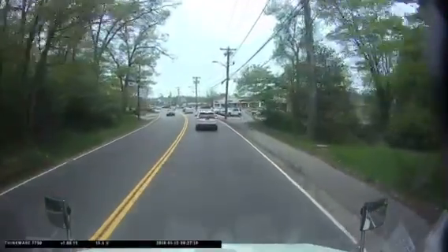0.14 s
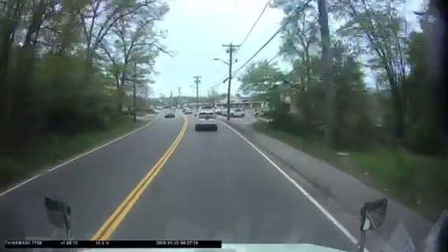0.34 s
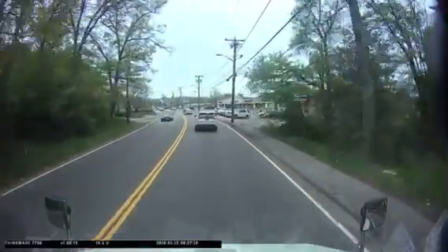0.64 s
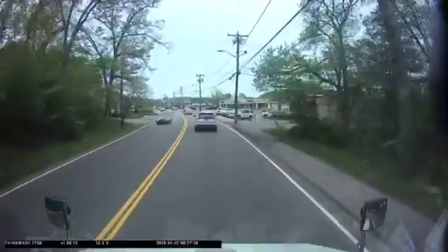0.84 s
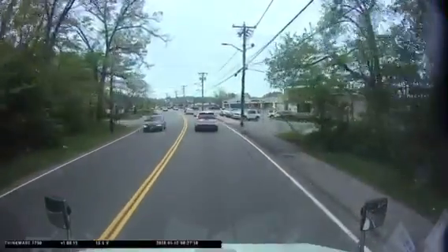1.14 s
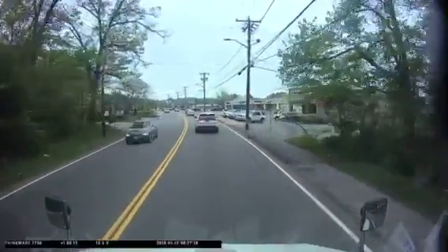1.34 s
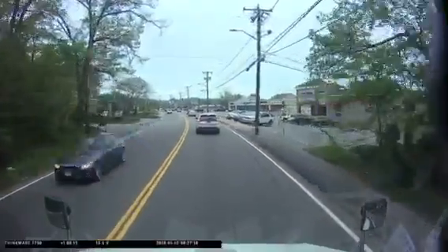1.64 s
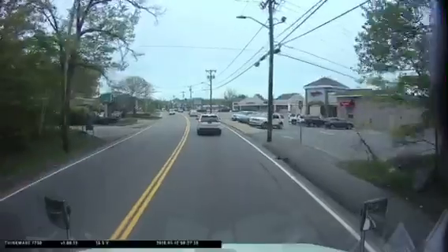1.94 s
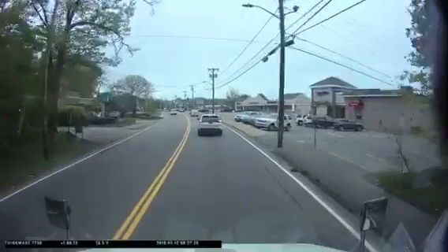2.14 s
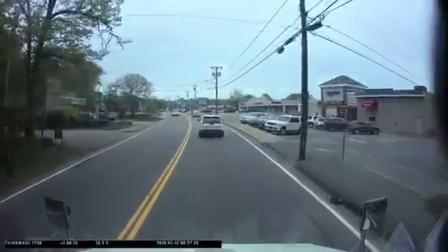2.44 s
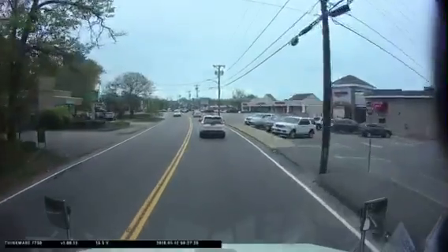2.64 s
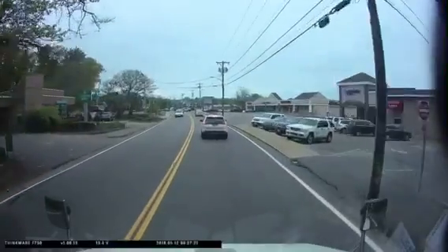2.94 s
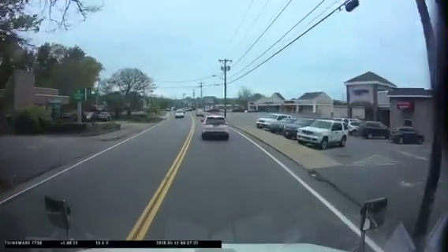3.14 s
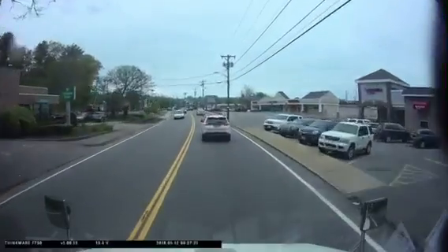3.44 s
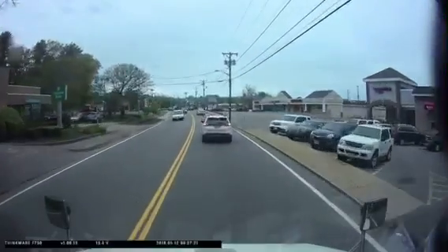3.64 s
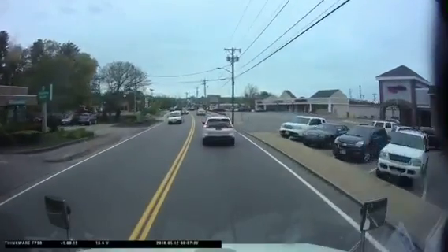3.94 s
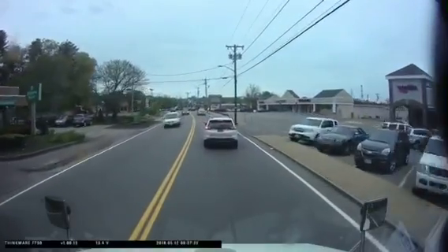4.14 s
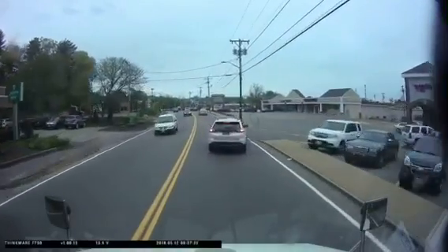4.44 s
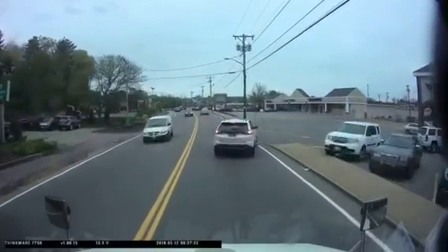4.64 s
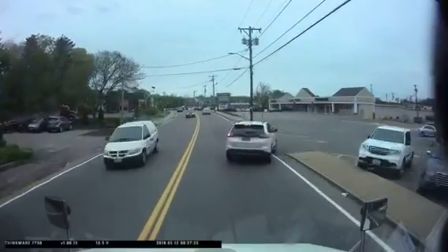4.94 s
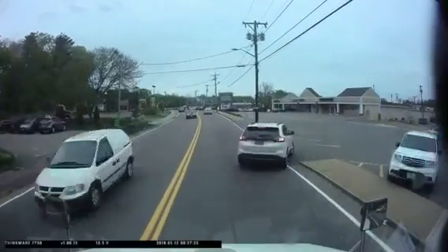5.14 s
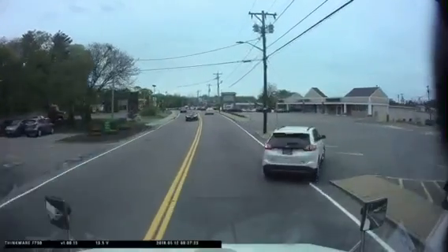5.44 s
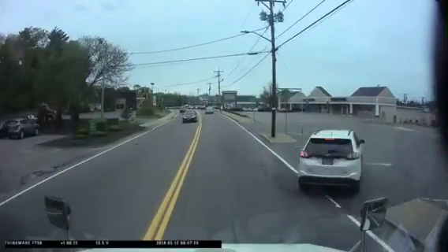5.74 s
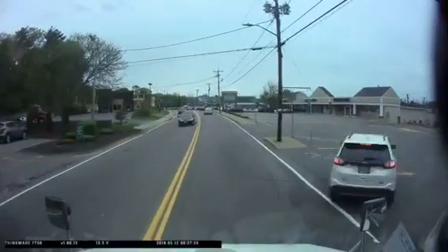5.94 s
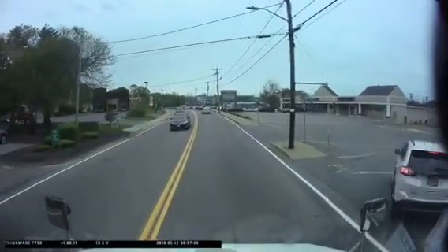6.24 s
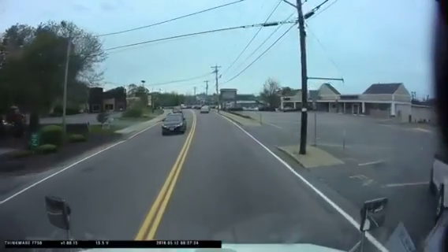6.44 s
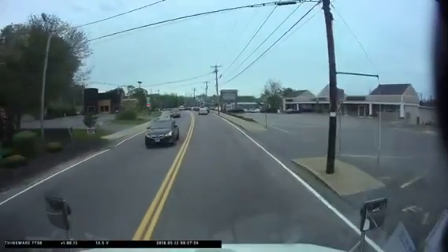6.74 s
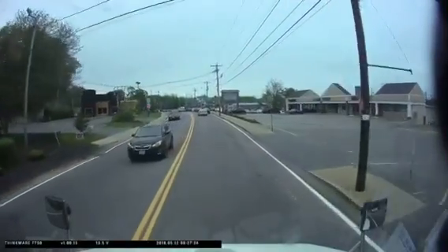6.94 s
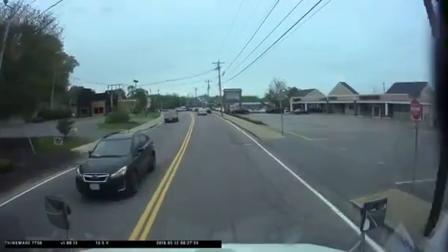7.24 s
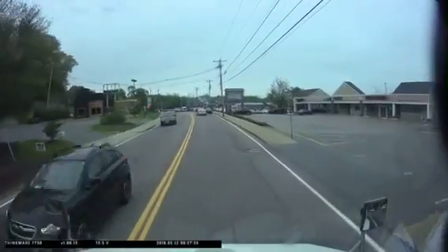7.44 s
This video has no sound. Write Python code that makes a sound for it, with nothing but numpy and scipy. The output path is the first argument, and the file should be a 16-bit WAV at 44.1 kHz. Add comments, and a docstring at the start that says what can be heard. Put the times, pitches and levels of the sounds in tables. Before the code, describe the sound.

Heard from a microphone inside a diesel truck cab: deep swaying rumble and dull tyre roar throughout, with a loose panel buzzing and ringing at bumps. The engine hum sinks as the truck coasts. A car swishes by, then trim clacks and squeaks and a little metal piece clinks. The engine pulls again with rough clatter, another car passes more softly, and the road grows coarser.

```python
"""Inside the cab of a diesel truck: it coasts on a swaying, roaring road while a loose panel buzzes and rings at bumps.
A thin whine follows the engine; an oncoming car swishes by at about 2.2 s, and the trim clacks and squeaks at 4.2 s.
A small piece of metal, which only ticks at first, clinks from about 4.4 s on. From about 5.2 s the engine pulls again.
Another car passes at about 5.7 s, and the road turns coarser from about 6.4 s.
Hums are sine waves tied to the engine speed, rushing sounds are filtered noise, and knocks are short bursts."""
import sys
import numpy as np
from scipy import signal
from scipy.fft import rfft, irfft
from scipy.io import wavfile
from scipy.ndimage import uniform_filter1d

SR = 44100
rng = np.random.default_rng(int(sys.argv[2]) if len(sys.argv) > 2 else 0)


def inscribe(sig):
    """Save sig as 16-bit PCM at rate SR to the path in sys.argv[1].

    A 1-D sig is mono; a 2-D sig holds one channel per row.
    Samples are clipped to [-1, 1] before scaling.
    """
    pcm = np.round(np.clip(np.atleast_2d(sig).T, -1, 1) * 32767)
    wavfile.write(sys.argv[1], SR, pcm.astype(np.int16))


N = 334719
TIME = np.arange(N) / SR
HZ = np.fft.rfftfreq(N, 1 / SR)

# cab resonances: center_hz, width_hz, lift_db
CAB_RESONANCES = [(413, 10.3, 6.5), (771, 22, 2.5), (1538, 265, 9.5), (2470, 90, 1.5), (2790, 95, -5.5),
                  (3110, 41, 5)]
# oncoming cars: loudest_s, half_duration_s, swish_db, roar_ahead_db, tread_pitch_hz, tread_db, wake_wind_db
ONCOMING_CARS = [(2.246, 0.18, -34.5, -28, 1549, -35.5, -60), (5.679, 0.2, -37, -39, 1588, -37.5, -44.5)]


def amp(db):
    """Turns decibels into a gain."""
    return 10 ** (np.asarray(db) / 20)


def unit(x):
    """Scales a signal to an average (rms) strength of 1."""
    return x / np.sqrt(np.mean(x ** 2) + 1e-20)


def curves(rows):
    """Draws straight lines between the rows of a time table, giving each column at every sample."""
    s, *columns = np.transpose(rows)
    return [np.interp(TIME, s, column) for column in columns]


def noise():
    """White noise: all pitches equally strong."""
    return rng.standard_normal(N)


def drift(hz):
    """Random wandering of rms 1, which fades out above roughly the given rate."""
    return unit(irfft(rfft(noise()) * np.exp(-(HZ / hz) ** 2), N))


def hump(offset):
    """A peak of 1 with wide skirts, down to one half at an offset of 1."""
    return 1 / (1 + offset ** 2)


def bell(s, half_s):
    """A smooth peak of 1 in time, down to 37 percent after half_s on either side."""
    return np.exp(-((TIME - s) / half_s) ** 2)


def resonances(hz, rows):
    """Adds up the lift in dB that resonant peaks give at the frequencies hz."""
    return sum(lift_db * hump(2 * (hz - center_hz) / width_hz) for center_hz, width_hz, lift_db in rows)


def colour(x, points, peaks=()):
    """Filters by a spectrum with resonant peaks on top, then scales to rms 1."""
    hz, db = np.transpose(points)
    db = np.interp(np.log(HZ + 1), np.log(hz + 1), db) + resonances(HZ, peaks)
    return unit(irfft(rfft(x) * amp(db), N))


def steadied(x, seconds):
    """Evens out swells slower than the given time."""
    width = int(seconds * SR / 2) + 1
    power = uniform_filter1d(uniform_filter1d(x ** 2, width), width)
    return x / np.sqrt(abs(power) + 1e-9)


def angle(hz):
    """Adds up a changing pitch into the running angle of a sine, from a random start."""
    return 2 * np.pi * (np.cumsum(hz) / SR + rng.random())


def burst(s, rise_s, decay_s):
    """Loudness shape of a blow: quick rise, fading tail, peak 1, at most half a second long."""
    out, start = np.zeros(N), int(s * SR)
    t = TIME[:min(SR // 2, N - start)]
    out[start:start + len(t)] = (1 - np.exp(-t / rise_s)) * np.exp(-t / decay_s)
    return out / out.max()


def crank():
    """Crankshaft turns per second; the engine races briefly as it takes up the drive."""
    # speed before that flare: time_s, turns_per_s
    speed_points = [(0, 29.9), (1, 28.93), (2, 27.98), (3, 26.82), (4, 25.78), (5.2, 24.65), (5.85, 24.6),
                    (6.6, 25.7), (7.59, 27.1)]
    flare = 0.048 * bell(5.4, half_s=0.085)  # as a share of the speed
    return curves(speed_points)[0] * (1 + flare)


def pull():
    """Engine load at every sample, following the accelerator."""
    # accelerator: time_s, load (0 to 1)
    load_points = [(0, 0.03), (5.19, 0.11), (5.3, 0.74), (5.9, 0.96), (6.5, 1), (7.59, 1)]
    return curves(load_points)[0]


def nearness():
    """Gain of the oncoming cars' swish, which swells and fades as each goes by."""
    return sum(amp(swish_db) * hump((TIME - s) / half_s) for s, half_s, swish_db, *_ in ONCOMING_CARS)


def rocking():
    """Size of the cab's sway: each dip builds a swing that the suspension damps out."""
    # dips in the road: start_s, sway_db, time_to_full_swing_s
    road_dips = [(.42, -17.5, 0.059), (1.02, -10, 0.059), (1.24, -11, 0.034), (1.58, -18, 0.26),
                 (2.04, -14.5, 0.062), (2.42, -26, .15), (3.42, -17, 0.19), (4.68, -17.5, 0.17),
                 (5.7, -15.5, 0.25), (6.14, -11, 0.24), (6.95, -14, 0.13), (7.42, -12, 0.1)]
    power = amp(-22) ** 2  # the sway without any dip
    for s, sway_db, swing_s in road_dips:
        age = np.maximum(TIME - s, 0) / swing_s
        power = power + (amp(sway_db) * age * np.exp(1 - age)) ** 2
    return np.sqrt(power)


def road():
    """The cab sways and shakes once a crank turn; tyres boom and roar, louder with crank speed and on coarse road."""
    # relative spectra of sway, boom and roar: pitch_hz, level_db (per Hz)
    sway_spectrum = [(1, -24), (7, 0.5), (11, 4.5), (17, 4), (24, -1.5), (29, 4.5), (40, -29), (70, -29.5),
                     (200, -93)]
    boom_spectrum = [(30, -31), (45, -19.5), (58, 2), (69, -9), (90, 1), (106, -2.5), (122, -3.5),
                     (150, -3.5), (175, -11.5), (200, -14.5), (300, -21.5), (800, -80)]
    roar_spectrum = [(80, -16.5), (200, 1), (290, -0.5), (360, 1), (520, -6.5), (780, -3.5), (1050, -9.5),
                     (1300, -22.5), (1750, -19.5), (2300, -29.5), (3300, -31.5), (4400, -47), (7000, -56),
                     (16000, -78)]
    # cab floor resonances: center_hz, width_hz, lift_db
    floor_resonances = [(87, 6.7, 4.5), (152.2, 14, 4.5)]
    coarse_start_s, coarse_rise_s = 6.44, 0.48
    speed = crank()
    pace = np.log10(speed / speed.mean())  # 1 would be ten times the mean crank speed
    coarse = np.clip((TIME - coarse_start_s) / coarse_rise_s, 0, 1)

    shake = 0.36 * amp(-6.3 * drift(0.84)) * np.sin(angle(speed))
    motion = colour(noise(), sway_spectrum) + shake
    sway = rocking() * steadied(motion, 0.14)

    boom_db = -31 + 2 * pace + 3.5 * coarse
    boom = amp(boom_db) * steadied(colour(noise(), boom_spectrum, floor_resonances), 0.23)

    patches_db = 0.5 * drift(25)
    roar_db = -30.5 + 18 * pace + 1.9 * coarse + patches_db
    roar = amp(roar_db) * colour(noise(), roar_spectrum, CAB_RESONANCES)
    return sway + boom + roar


def thumps():
    """A wheel meets a seam and the cab floor booms for a few uneven cycles."""
    # seams in the road: start_s, peak_db, middle_pitch_hz, decay_s
    seams = [(1.07, -20, 84, .045), (1.513, -18.5, 148, 0.022), (6.058, -17.5, 151, .022),
             (6.715, -16.5, 149.6, 0.032), (7.496, -21, 142, 0.044)]
    out = np.zeros(N)
    for s, peak_db, hz, decay_s in seams:
        uneven_hz = hz * (1 + 0.065 * drift(40))
        out += amp(peak_db) * burst(s, 0.0091, decay_s) * np.sin(angle(uneven_hz))
    return out


def traffic():
    """Each oncoming car brings a dull roar from ahead, then a swish, a falling tread note and a puff of wind."""
    # relative spectra of roar from ahead, swish and dragged wind: pitch_hz, level_db (per Hz)
    ahead_spectrum = [(100, -47), (500, -30), (630, 5), (710, 3.5), (850, 4), (1150, -6), (1600, -29),
                      (3000, -41), (9000, -87)]
    swish_spectrum = [(400, -29), (700, -2), (1150, -2), (1350, -5), (1600, -3.5), (2200, -15), (3300, -19),
                      (4500, -35), (5500, -36.5), (9000, -53.5), (16000, -89)]
    wake_spectrum = [(700, -25), (1050, 13.5), (1400, -8.5), (2400, -5.5), (3600, -18), (5400, -20),
                     (7000, -31), (12000, -50)]
    lead_s = 0.11  # the roar peaks this much before the swish
    tread_lag_s, tread_half_s, tread_spread_hz = 0.0344, 0.0902, 77
    doppler = 0.03  # share by which the tread's pitch starts above and ends below its middle
    roar = colour(noise(), ahead_spectrum, CAB_RESONANCES)
    wind = colour(noise(), wake_spectrum)
    out = nearness() * colour(noise(), swish_spectrum, CAB_RESONANCES)
    for s, half_s, _, roar_db, hz, tread_db, wake_db in ONCOMING_CARS:
        place = (TIME - s - tread_lag_s) / tread_half_s  # below 0 ahead, above 0 behind
        turn = angle(hz * (1 - doppler * place / np.hypot(1, place)))
        # two random swells make a narrow band of noise around the tread's pitch
        tread = drift(tread_spread_hz) * np.cos(turn) + drift(tread_spread_hz) * np.sin(turn)
        out += amp(roar_db) * hump((TIME + lead_s - s) / half_s) * roar
        out += amp(wake_db) * hump((TIME - s) / half_s) * wind
        out += amp(tread_db) * hump(place) * tread
    return out


def moments(count):
    """Picks random times in the scene, in seconds."""
    return rng.uniform(0, TIME[-SR // 10], count)


def trim():
    """Plastic trim ticks grittily and chirps as the cab flexes; once it clacks, rings and slips with a rough squeak."""
    # ticks and a double clack: start_s, peak_db, decay_s, brightness (0 dull to 1 sharp)
    tick_list = [(1.161, -57, 0.0065, 0.7), (1.186, -43, 0.0017, 0.05), (4.153, -41.5, 0.0073, 0.8),
                 (4.169, -57, 0.0048, 0.8), (4.749, -48, 0.0036, 0.2), (6.508, -56, 0.0037, 0.92),
                 (6.853, -33, 0.0019, 0.2)]
    # relative spectra of dull and sharp contact: pitch_hz, level_db (per Hz)
    dull_spectrum = [(200, -27), (1000, -13), (2000, -28), (2500, 11), (3050, 0), (3700, 8), (4500, -22),
                     (7000, -22), (15000, -48.5)]
    sharp_spectrum = [(2000, -11), (3900, 3), (4800, 2), (5800, 6), (6600, -3), (7300, -13), (8400, -6),
                      (10000, -26), (15000, -34)]
    # resonances of dull contact: center_hz, width_hz, lift_db
    dull_resonances = [(520, 220, 18), (1582, 200, 14), (3000, 180, 8)]
    # ringing after the clack: pitch_hz, peak_db, decay_s
    clack_ring = [(349, -30, 0.008), (465, -33, 0.009), (616, -30, 0.0082), (774, -32, .008),
                  (1576, -36, 0.010), (2446, -41, 0.007), (3024, -34.5, 0.0085), (3780, -47, 0.014)]
    # squeak before its roughness: time_s, pitch_hz, level_db
    squeak_points = [(4.194, 5000, -66), (4.199, 5300, -46), (4.206, 5780, -44), (4.213, 6030, -43),
                     (4.228, 5880, -59), (4.240, 5850, -66)]
    # rubbing chirps: loudest_s, half_duration_s, pitch_hz, level_db
    chirp_list = [(6.795, .018, 6720, -63), (7.116, .008, 5830, -57)]
    clack_s, grit_db = 4.155, 4

    contact = noise() * amp(grit_db * drift(500))
    dull = colour(contact, dull_spectrum, dull_resonances)
    sharp = colour(contact, sharp_spectrum)
    out = np.zeros(N)
    for s, peak_db, decay_s, bright in tick_list:
        out += amp(peak_db) * burst(s, 0.021, decay_s) * ((1 - bright) * dull + bright * sharp)
    for s in moments(count=5):  # faint stray ticks
        out += amp(-66) * burst(s, 0.0092, 0.004) * sharp
    for hz, peak_db, decay_s in clack_ring:
        out += amp(peak_db) * burst(clack_s, 0.0032, decay_s) * np.sin(2 * np.pi * hz * TIME)

    hz, level_db = curves(squeak_points)
    slipping = (TIME > squeak_points[0][0]) & (TIME < squeak_points[-1][0])
    rough_hz = hz * (1 + 0.03 * drift(710))
    out += slipping * amp(level_db + grit_db * drift(400)) * np.sin(angle(rough_hz))
    for s, half_s, hz, level_db in chirp_list:
        out += amp(level_db) * bell(s, half_s) * np.sin(2 * np.pi * hz * TIME)
    return out


def clinks():
    """A small metal piece ticks on contact; struck freely, its two close modes ring on and beat as they die."""
    # the two modes: pitch_hz, time_to_fall_60_db_s (before each clink's own factor)
    metal_modes = [(7297, 0.33), (7397, .28)]
    # ringing clinks: start_s, lower_mode_db, upper_mode_db, ring_time_factor
    clink_list = [(4.366, -48, -57, 0.81), (4.5961, -60, -47, 0.71), (5.102, -50.5, -75, 1.0),
                  (5.3218, -55, -75.5, 0.77), (7.1434, -45, -56, 0.89), (7.227, -46.5, -54, 1)]
    # light touches that do not ring: start_s, peak_db
    touch_list = [(1.338, -66), (1.777, -61), (4.06, -60.5), (4.227, -58), (6.948, -63), (7.103, -56)]
    # relative spectrum of the contact tick: pitch_hz, level_db (per Hz)
    contact_spectrum = [(3000, -40), (6500, -9), (7600, -6), (8200, 4), (9000, -15), (10500, -16),
                        (12800, -12), (15000, -20)]
    tick_db, tick_decay_s = -9.5, 0.0026  # tick_db is against the louder mode of a clink
    ring = np.zeros(N)
    ticks = sum(amp(peak_db) * burst(s, 0.002, tick_decay_s) for s, peak_db in touch_list)
    for s, *levels_db, hold in clink_list:
        start = int(s * SR)
        t = TIME[:N - start]
        for level_db, (hz, fall_s) in zip(levels_db, metal_modes):
            ring[start:] += amp(level_db - 60 * t / (fall_s * hold)) * np.sin(2 * np.pi * hz * t)
        ticks += amp(max(levels_db) + tick_db) * burst(s, 0.0003, tick_decay_s)
    return ring + ticks * colour(noise(), contact_spectrum)


def trembling():
    """Size of the panel's chatter: lively when coasting, calmer under load, stirred by passing cars."""
    # moments of near rest: middle_s, half_duration_s, change_db
    rest_list = [(1.14, 0.045, -11), (1.505, 0.091, -13)]
    rests_db = sum(db * bell(s, half_s) for s, half_s, db in rest_list)
    own = amp(-33.5 - 7.5 * pull() + rests_db)
    stirred = amp(3.5) * nearness()
    return np.hypot(own, stirred)


def panel():
    """A loose panel chatters in its own modes; each bump thuds and sets it ringing at a slightly different pitch."""
    # modes of the panel: pitch_hz, width_hz, level_db (relative)
    panel_modes = [(918.6, 43, 4.5), (977, 70, -8.5), (2940, 140, -37)]
    # bumps: start_s, ring_db (before the mode levels), first_mode_pitch_hz, ring_decay_s, thud_db
    bump_list = [(0.025, -29, 927.6, 0.026, -41.5), (0.205, -30.5, 930, 0.026, -52),
                 (0.688, -29, 927.5, 0.019, -52), (0.864, -31, 933, 0.025, -49),
                 (1.005, -30, 916, 0.024, -42), (1.058, -32, 926, 0.017, -47),
                 (1.187, -27.5, 943.4, 0.0079, -22.5), (1.206, -26.5, 922, 0.019, -48),
                 (1.25, -30.5, 906, 0.027, -52), (1.359, -32, 942, 0.018, -52),
                 (1.586, -27.5, 929, 0.03, -27.5), (1.842, -44.5, 950, 0.0081, -50),
                 (1.873, -32.5, 890, 0.0064, -48), (2.698, -28.5, 933, 0.016, -47),
                 (2.828, -28.5, 958, 0.0089, -42), (3.544, -32, 916.5, 0.014, -50),
                 (3.655, -31, 922, 0.02, -53), (3.836, -27.5, 947, 0.016, -54),
                 (3.878, -31.5, 908.5, 0.0095, -52.5), (3.905, -35.5, 927, 0.018, -50),
                 (4.001, -30, 930.5, 0.012, -57), (4.162, -26, 957, 0.008, -25),
                 (4.291, -32, 923, 0.024, -50), (4.376, -35, 938, 0.014, -50),
                 (4.41, -32.5, 922, 0.016, -50), (4.541, -28, 920, 0.03, -44), (4.65, -31, 918, 0.022, -44),
                 (4.699, -29.5, 917, 0.012, -50), (4.885, -33, 924, 0.023, -45),
                 (5.117, -30, 915, 0.011, -50), (5.263, -24, 932, 0.0084, -40),
                 (5.303, -23.5, 925, 0.011, -34), (5.345, -26.5, 907, 0.011, -43),
                 (5.381, -25, 930, 0.024, -28), (5.617, -25, 917, 0.023, -46),
                 (5.819, -25.5, 930, 0.029, -32), (6.179, -26, 919, 0.011, -30),
                 (6.23, -28.5, 935, 0.03, -22.5), (6.483, -29, 925, 0.015, -23),
                 (6.499, -30, 912, 0.019, -30), (6.646, -25, 971, 0.0085, -21.5),
                 (6.685, -28.5, 956, 0.021, -51), (6.912, -23.5, 920, 0.015, -31)]
    # relative spectrum of the thud: pitch_hz, level_db (per Hz)
    thud_spectrum = [(120, -13), (330, 9.5), (550, 10.5), (900, -0.5), (1300, -11.5), (1700, -10),
                     (2700, -15), (3500, -20), (5000, -43), (9000, -56.5)]
    response = sum(amp(db) * hump(2 * (HZ - hz) / width_hz) for hz, width_hz, db in panel_modes)
    chatter = steadied(irfft(rfft(noise()) * response, N), 0.12)
    buzz = chatter * trembling() * amp(1.5 * drift(6.5))

    swing, stretch, thuds = np.zeros((3, N))
    for s, ring_db, hz, decay_s, thud_db in bump_list:
        blow = amp(ring_db) * burst(s, 0.0035, decay_s)
        swing += blow
        stretch += blow * (hz / panel_modes[0][0] - 1)
        thuds += amp(thud_db) * burst(s, 0.0017, 0.012)
    pitch = 1 + stretch / (swing + 1e-9)  # where rings overlap, the stronger blow counts more
    ring = np.zeros(N)
    for hz, _, db in panel_modes:
        ring += amp(db) * np.sin(angle(hz * pitch * (1 + 0.02005 * drift(76.2))))
    return buzz + swing * ring + thuds * colour(noise(), thud_spectrum, CAB_RESONANCES)


def whine():
    """The thin wavering tone of a fast-spinning part, geared to the crankshaft; it wobbles more under load."""
    # level before wavering, sinking into the road noise for a while: time_s, level_db
    level_points = [(0, -74), (0.5, -77), (0.85, -84), (1.5, -77), (1.95, -79), (2.3, -73.5), (3.6, -71),
                    (3.95, -78), (4.6, -72), (5.4, -71), (6.6, -71), (7.59, -72)]
    # partials: multiple_of_pitch, level_db (relative)
    whine_partials = [(1, -1), (1.022, -9), (1.5, -13), (2, -12)]
    load = pull()
    wobble = 0.001 * drift(40) + 0.003 * load * drift(13)
    # 199.3 cycles per crank turn, and 1.2 percent higher at full load
    hz = 199.3 * crank() * (1 + 0.012 * load) * (1 + wobble)
    level_db = curves(level_points)[0] + 1.5 * drift(20)
    return amp(level_db) * sum(amp(db) * np.sin(angle(k * hz)) for k, db in whine_partials)


def engine():
    """Crank and drive shaft hums pass through the cab air; under load, uneven puffs of combustion clatter join in."""
    # hums before air resonance and wavering: multiple_of_crank_speed, coast_fast_db, coast_slow_db, full_load_db
    hum_orders = [(2, -30.5, -66.5, -32.5), (2.22, -33, -52, -47.5), (2.67, -29.5, -57, -51),
                  (3, -40, -49, -34), (3.33, -41.5, -37.5, -37), (4.01, -36, -35.5, -36),
                  (5, -42, -43.5, -42), (5.33, -43, -52, -54.5), (6, -45.5, -40, -41.5),
                  (6.17, -37.5, -45, -57.5), (6.67, -57, -51, -47.5), (7, -46.5, -50, -51.5),
                  (7.7, -60, -58, -43), (12, -71, -48.5, -44.5)]
    # resonances of the cab air, which boom as a hum slides through: center_hz, width_hz, lift_db
    air_resonances = [(90.4, 20.7, 10), (164.8, 28, 5.5)]
    # throb of the clatter: multiple_of_crank_speed, depth (0 to 1)
    puff_orders = [(2, .14), (3, .08), (4, .09)]
    # relative spectrum of the clatter: pitch_hz, level_db (per Hz)
    clatter_spectrum = [(150, -10), (320, 7), (420, 5), (570, 18), (800, 7), (1080, 13.5), (1350, -1.5),
                        (2000, 0.5), (2900, -6), (3700, -5.5), (4500, -21.5), (6000, -20.5), (7500, -31),
                        (16000, -42)]
    # resonance of the engine's covers: center_hz, width_hz, lift_db
    cover_resonances = [(2793, 110, 16.5)]
    # short dips of the hum: middle_s, half_duration_s, change_db
    hum_dips = [(3.2, .3, -3), (5.85, .14, -6.5)]
    speed = crank()
    fast = (speed - speed.min()) / np.ptp(speed)  # 0 at the slowest, 1 at the fastest
    load = pull()
    speed = speed * (1 + 0.00082 * drift(5.8))  # tiny hunting of the speed

    hum = np.zeros(N)
    for k, fast_db, slow_db, load_db in hum_orders:
        coast_db = slow_db + fast * (fast_db - slow_db)
        air_db = resonances(k * speed, air_resonances)
        level_db = coast_db + load * (load_db - coast_db) + air_db + drift(1.8)
        hum += np.sqrt(2) * amp(level_db) * np.sin(angle(k * speed))
    dips_db = sum(db * bell(s, half_s) for s, half_s, db in hum_dips)

    puffs = 1 + sum(depth * np.cos(angle(k * speed)) for k, depth in puff_orders)
    clatter = colour(noise() * puffs, clatter_spectrum, CAB_RESONANCES + cover_resonances)
    return amp(dips_db) * hum + amp(-38) * load * clatter


def scene():
    """Adds up everything heard in the cab, as one channel."""
    return (road() + thumps() + traffic() + trim() + clinks() + panel() + whine() + engine())[None]


def record(dry):
    """The camera adds a faint hiss and faint electrical tones, then cuts the highest treble."""
    # steady electrical tones: pitch_hz, level_db (rms)
    tone_list = [(5001, -86), (6000, -87), (9604, -87), (10417, -81), (10998, -90), (13001, -91)]
    # relative spectrum of the hiss: pitch_hz, level_db (per Hz)
    hiss_spectrum = [(1000, -7.5), (5500, -0.5), (7400, -10.5), (8900, 3.5), (9700, 2), (11300, -2),
                     (12000, -9), (13000, -2.5), (13700, -10), (15700, -10.5)]
    tones = sum(np.sqrt(2) * amp(db) * np.sin(2 * np.pi * hz * TIME) for hz, db in tone_list)
    hiss = amp(-68.5 + 2.5 * drift(26)) * colour(noise(), hiss_spectrum)
    lowpass = signal.firwin(511, 15760, window=("kaiser", 9), fs=SR)  # keeps pitches below 15760 Hz
    return signal.oaconvolve(dry + tones + hiss, lowpass[None], "same")


dry = scene()
out = record(dry)
inscribe(out)
```